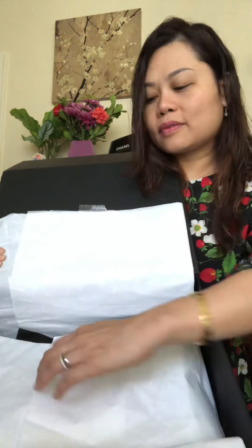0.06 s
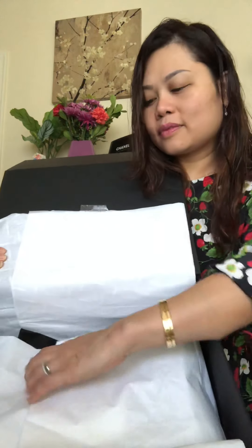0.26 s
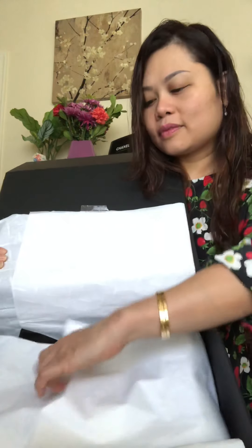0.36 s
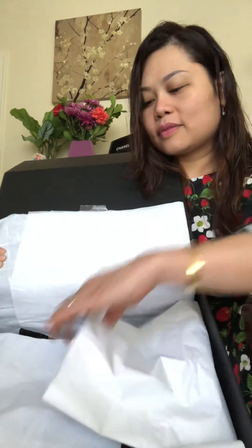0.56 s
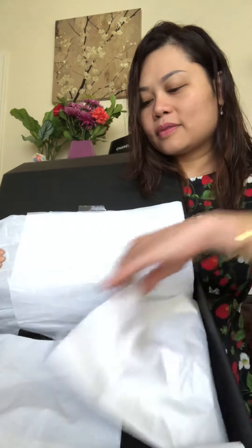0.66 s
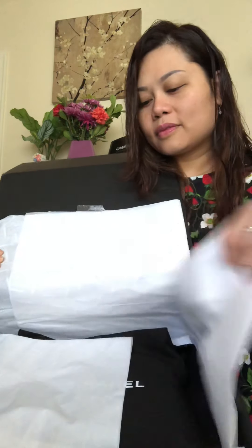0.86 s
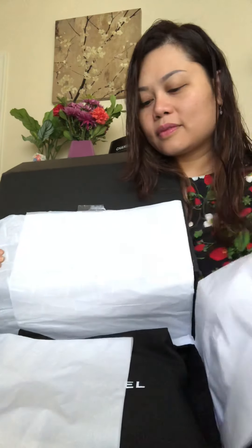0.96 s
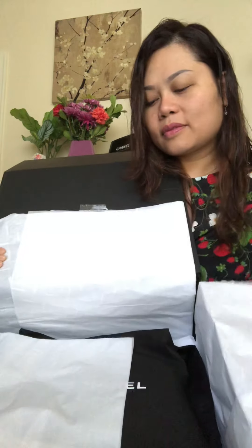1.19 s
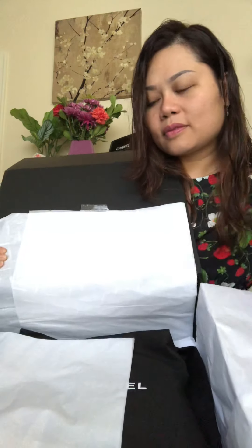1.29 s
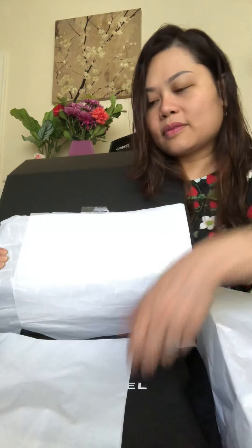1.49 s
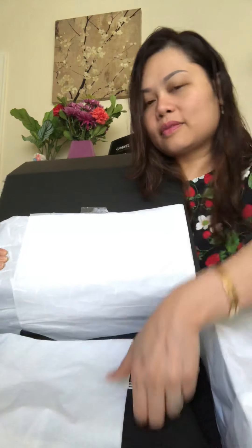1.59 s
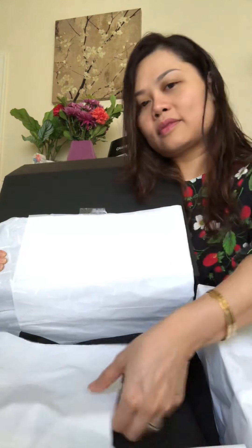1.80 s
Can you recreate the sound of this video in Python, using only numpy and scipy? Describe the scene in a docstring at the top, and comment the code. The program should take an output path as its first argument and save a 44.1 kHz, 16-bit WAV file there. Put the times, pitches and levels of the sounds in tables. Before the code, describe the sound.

Thin tissue paper crackles, rustles densely, snaps loudly, then fades to a few small ticks

```python
"""A hand lifts and folds back a sheet of tissue paper in a box, near a phone in a quiet room.
First a few creases crackle alone over a faint, uneven room rumble and a thin hiss. From 0.2 s the paper
rustles, a dense shower of tiny noise clicks, with a soft low flutter as the moving sheet pushes air.
Near 1.15 s the loudest creases snap flat as sharp pushes; then the rustle fades, leaving lone crackles and
low knocks of the box. Near the end the hand softly brushes the hollow box, heard as noise in one low band."""
import sys
import numpy as np
from scipy import signal
from scipy.fft import rfft, irfft
from scipy.io import wavfile
from scipy.ndimage import uniform_filter1d

SR = 44100
rng = np.random.default_rng(int(sys.argv[2]) if len(sys.argv) > 2 else 0)


def makeup_ratio(level_db):
    """Linear amplitude ratio for a level in decibels (20 dB per factor of ten)."""
    decades = np.asarray(level_db, float) / 20
    return 10 ** decades


def dump_mix(stems):
    """Bounce the given channels to the path in sys.argv[1] as a 16-bit WAV at rate SR."""
    frames = np.atleast_2d(stems).T  # one column per channel
    limited = np.clip(frames, -1, 1)  # hard clip at full scale
    pcm = np.round(limited * 32767).astype(np.int16)
    wavfile.write(sys.argv[1], SR, pcm)


N = 81585  # length in samples

# How hard the paper is worked: (time [s], rustle level [dB], tilt about 4 kHz [dB per octave])
HANDLING = [(0, -65.5, -4.5), (.05, -68.5, -4.5), (.132, -70, -6), (.185, -69, -2), (.2, -47.5, -2),
            (.24, -42.5, -1.5), (.31, -51.5, -2), (.355, -49, -2), (.385, -41.5, -1), (.45, -40, -1.5),
            (.515, -43, -2.5), (.6, -42, -2), (.7, -40.5, -2), (.75, -43.5, -1.5), (.8, -38, -2),
            (.82, -43, -1), (.86, -40.5, -1.5), (.97, -40, -0.5), (1.04, -35.5, 1), (1.085, -27.5, -1),
            (1.125, -39, 0), (1.174, -34, -2), (1.21, -41.5, -0.5), (1.27, -48, -1), (1.36, -53.5, -2.5),
            (1.45, -64, -3), (1.65, -71, -1), (1.75, -61.5, -6), (1.85, -59.5, -3)]
# Smooth sliding of paper on paper: (time [s], level against the clicks [dB])
SLIDING = [(0, 4), (.2, 0.5), (.5, -0.5), (.7, 2), (.95, 0.5), (1.04, 1.5), (1.12, 1.5), (1.15, 2.5),
           (1.45, -4), (1.75, 0), (1.85, 6)]
# Crackling creases and low knocks of the box:
# (time [s], peak [dB], ring [Hz], length [ms], tilt [dB per octave])
CRACKLES_AND_KNOCKS = [(0.0297, -35.5, 1470, 4.6, -5.5), (0.0309, -32, 3340, 3.3, 1.5),
                       (0.0599, -38, 2740, 2.5, -3), (.077, -43, 4700, 2.7, -6),
                       (0.084, -43, 3630, 3.2, -5), (0.1412, -50.5, 4840, 1.8, -4),
                       (0.1723, -45.5, 6000, 2.4, -0.5), (0.2046, -34, 2620, 11.5, -3),
                       (0.2298, -31.5, 1010, 5.1, -0.5), (0.2385, -31.5, 3000, 2.9, -3.5),
                       (0.272, -35.5, 5210, 4.1, -7.5), (0.318, -39, 7540, 2.1, -1),
                       (0.3814, -24, 11600, 1.5, 7), (0.3861, -27, 11900, 2, 4.5),
                       (.4478, -33, 14000, 2.5, 7), (0.5281, -24.5, 12200, 2.2, -1),
                       (0.5322, -27, 3570, 2.8, -1), (0.5375, -22, 10500, 4.7, -3),
                       (0.6157, -25.5, 15000, 2.2, -3.5), (0.644, -29, 5140, 4.8, -4.5),
                       (0.675, -26, 8000, 4.5, -3), (0.688, -24, 13000, 3.6, -3),
                       (0.8349, -28, 5080, 1.9, -6), (.857, -32, 3570, 3.3, -5),
                       (1.0213, -15.5, 4300, 1.7, -1.5), (1.2211, -26.5, 1400, 1.78, -6.5),
                       (1.2317, -35.5, 500, 4.4, -8), (1.3, -34, 13200, 3.4, -2),
                       (1.343, -36, 4700, 1.8, -1), (1.3456, -25, 4480, 2.4, -1),
                       (1.346, -38.5, 990, 2.1, -11), (1.3474, -46.5, 348, 2.4, -10),
                       (1.3992, -40.5, 2720, 2.5, -4.5), (1.546, -36, 4730, 4.7, -1),
                       (1.547, -46, 1530, 5.9, -8.5), (1.593, -40.5, 6500, 1.5, -6),
                       (1.678, -38.5, 4800, 1.54, 2), (1.699, -57, 4000, 0.93, -2),
                       (1.7111, -34.5, 4750, 1.3, 0), (1.7405, -44.5, 4000, 1.9, 0),
                       (1.8424, -41, 2700, 6.1, -2)]
# Creases that snap flat at once: (time [s], peak [dB], ring [Hz], tilt [dB per octave])
SNAPPING_CREASES = [(.4428, -24, 10000, 1), (.9108, -24, 12500, 4), (1.0103, -17, 14000, 3),
                    (1.1463, -4.5, 7500, .5), (1.1697, -1.5, 12900, 2), (1.1761, -21, 2690, -3.5),
                    (1.1834, -9, 8970, 1.5), (1.1918, -10.5, 12800, 1), (1.8344, -31, 13600, 0)]
# Tone colour of clicking paper: (frequency [Hz], gain [dB])
PAPER_COLOUR = [(240, -28), (400, -4), (700, -9), (1200, -5.5), (2250, -5.5), (3600, -2.5), (5500, -1.5),
                (7500, -3), (9500, -3.5), (12000, 0.5), (14500, 0), (16500, -6.5)]
# Low flutter of the sheet: (time [s], level [dB])
FLUTTER_LEVEL = [(0.17, -78), (0.212, -49), (0.3, -58.5), (0.496, -48), (0.516, -56.5), (0.544, -47),
                 (0.558, -56.5), (1.006, -48), (1.026, -41), (1.062, -48), (1.1, -43), (1.334, -62),
                 (1.344, -53.5), (1.41, -72.5), (1.718, -71.5), (1.792, -62.5), (1.85, -59)]
# Tone colour of the air pushed by the sheet: (frequency [Hz], gain [dB])
SHEET_COLOUR = [(59, -26), (100, -12), (161, -3), (280, 1), (496, -3.5), (1200, -13.5), (1560, -18),
                (2640, -120)]
# Loudness of the room rumble: (time [s], level [dB])
RUMBLE_LEVEL = [(0.0, -57), (0.15, -59), (0.484, -61.5), (0.654, -45.5), (0.726, -72), (0.808, -50.5),
                (0.834, -63), (0.854, -53.5), (0.932, -59), (1.144, -48), (1.308, -61), (1.762, -57.5),
                (1.85, -58)]
# Tone colour of the room rumble: (frequency [Hz], gain [dB])
RUMBLE_COLOUR = [(15, -47), (25, -32), (58, -4.5), (92, 2), (172, -13), (345, -11.5), (399, -18.5),
                 (800, -31), (1040, -24.5), (1760, -120)]
# Tone colour of the steady hiss: (frequency [Hz], gain [dB])
HISS_COLOUR = [(290, -32), (500, -5.5), (2390, -20.5), (7420, -24.5), (8960, -36), (16000, -43)]

CLICKS_PER_S, USUAL_DB = 4500, -45  # all clicks together, when the rustle is at the usual level
CROWDING = 0.5  # clicks crowd as the paper is worked harder (dB of rate per dB of level)
CLICK_SCATTER_DB, BIGGEST_CLICK_DB, GRAIN_MS = 4.5, 7, 0.51
BUNCH_DB, BUNCH_PER_S = 3, 107
RING_Q, BURST_RING_DB, SNAP_RING_DB = 12, 7, 2
BURST_ROUGH_DB = 2.5
SNAP_MS, SNAP_TAIL_MS, SNAP_TAIL_DB = 0.064, 0.97, -21.5
SNAP_SPREAD = 0.503  # how late the bass of a snap arrives, 0-1
RUB_S, RUB_LEN_S, RUB_HZ, RUB_WIDTH_HZ, RUB_DB = 1.79, 0.025, 310, 50, -57
HISS_DB = -70
ECHO_DB, ECHO_T60_S, ECHO_GAP_S = -20, 0.22, 0.0094  # T60: time to fade by 60 dB


def column(table, k):
    """Column k of a table, drawn as a curve with a value at every sample."""
    rows = np.array(table, float)
    return np.interp(np.arange(N) / SR, rows[:, 0], rows[:, k])


def unit(x):
    """Scales a sound to an rms (average strength) of 1."""
    return x / np.sqrt(np.mean(x ** 2))


def colour(x, points, tilt_db=0., ring_hz=4000., ring_db=-99.):
    """Filters by a table of gains, a tilt and one resonance, with no sound ahead of its cause."""
    hz = np.maximum(np.fft.rfftfreq(2048, 1 / SR), 10)
    point_hz, point_db = np.array(points, float).T
    db = np.interp(np.log(hz), np.log(point_hz), point_db)
    db = db + tilt_db * np.log2(np.clip(hz, 1300, 16000) / 4000)
    resonance = makeup_ratio(ring_db) / np.hypot(1, RING_Q * (hz / ring_hz - ring_hz / hz))
    # folding the cepstrum (spectrum of the log gain) forward makes the filter minimum phase
    cepstrum = irfft(np.log(makeup_ratio(db) * (1 + resonance)))
    cepstrum[1:1024] *= 2
    cepstrum[1025:] = 0
    response = irfft(np.exp(rfft(cepstrum)))
    return signal.fftconvolve(x, response)[:len(x)]


def wander(rate):
    """Random wandering curve of rms 1, smoothed twice over 1 / rate seconds."""
    k = max(int(SR / rate), 2)
    once = uniform_filter1d(rng.standard_normal(N), k)
    return unit(uniform_filter1d(once, k))


def rustle():
    """Tiny creases click in bunches, as short grains in ten pitch bands, over the slide of paper on paper."""
    level, tilt = column(HANDLING, 1), column(HANDLING, 2)
    shared_bunch = wander(BUNCH_PER_S)
    fade = np.exp(-1000 / SR / GRAIN_MS)
    crowd = makeup_ratio(CROWDING * (level - USUAL_DB))
    out = 0
    for hz in 700 * 2 ** np.arange(0, 4.6, .5):
        hit = rng.random(N) < CLICKS_PER_S / 10 / SR * crowd
        scatter_db = CLICK_SCATTER_DB * rng.exponential(size=N)
        size = hit * makeup_ratio(np.minimum(scatter_db, BIGGEST_CLICK_DB)) / crowd ** .5
        envelope = signal.lfilter([1], [1, -fade], size)
        grains = unit(envelope * rng.standard_normal(N))
        bunch = shared_bunch + 1.1 * wander(BUNCH_PER_S)
        bunched = grains * makeup_ratio(BUNCH_DB * 2 * np.tanh(bunch / 2))  # tanh softly limits the swings
        slide = makeup_ratio(column(SLIDING, 1)) * rng.standard_normal(N)
        band = signal.butter(1, [hz / 1.25, hz * 1.25], "band", fs=SR, output="sos")
        out = out + signal.sosfilt(band, bunched + slide) * makeup_ratio(tilt * np.log2(hz / 4000))
    return unit(colour(out, PAPER_COLOUR)) * makeup_ratio(level)


def add(out, s, burst, db):
    """Places a burst at its time with its peak level."""
    i = int(s * SR)
    out[i:i + len(burst)] += (burst * makeup_ratio(db) / np.abs(burst).max())[:N - i]


def crackles_and_knocks():
    """Larger creases crackle and the box knocks low, each as a short, uneven burst of noise with a ring."""
    out, t_ms = np.zeros(N), np.arange(2048) / SR * 1000
    for s, db, hz, ms, tilt in CRACKLES_AND_KNOCKS:
        noise, roughness = rng.standard_normal((2, len(t_ms)))
        age = t_ms / max(ms, .2)
        shape = age ** .5 * np.exp(-age ** 2)
        burst = shape * noise * makeup_ratio(BURST_ROUGH_DB * roughness)
        ring_db = BURST_RING_DB - tilt / 2  # dull knocks ring more
        add(out, s, colour(burst, PAPER_COLOUR, tilt, hz, ring_db), db)
    return out


def snaps():
    """A crease that snaps flat gives one sharp push with a faint noisy tail."""
    out, t_ms = np.zeros(N), np.arange(2048) / SR * 1000
    for s, db, hz, tilt in SNAPPING_CREASES:
        noise = rng.standard_normal(len(t_ms))
        push = (t_ms == 0) + 0.098 * noise * np.exp(-t_ms / SNAP_MS)
        push = push + makeup_ratio(SNAP_TAIL_DB) * noise * np.exp(-t_ms / SNAP_TAIL_MS)
        # three all-pass filters delay the bass and leave the loudness of each pitch alone
        push = signal.sosfilt([[-SNAP_SPREAD, 1, 0, 1, -SNAP_SPREAD, 0]] * 3, push)
        add(out, s, colour(push, PAPER_COLOUR, tilt, hz, SNAP_RING_DB), db)
    return out


def flutter():
    """The sheet shoves air in soft uneven puffs, made of low noise with a wandering level."""
    puffs = rng.standard_normal(N) * makeup_ratio(2.0 * wander(37))
    return unit(colour(puffs, SHEET_COLOUR)) * makeup_ratio(column(FLUTTER_LEVEL, 1))


def rub():
    """The hand brushes the hollow box and wakes one low resonance, a narrow band of noise."""
    edges = [RUB_HZ - RUB_WIDTH_HZ / 2, RUB_HZ + RUB_WIDTH_HZ / 2]
    band = signal.butter(1, edges, "band", fs=SR, output="sos")
    swell = np.exp(-((np.arange(N) / SR - RUB_S) / RUB_LEN_S) ** 2)
    return unit(signal.sosfilt(band, rng.standard_normal(N))) * swell * makeup_ratio(RUB_DB)


def room_tone():
    """Low noise of changing level makes the rumble; thin noise of steady level makes the hiss."""
    rumble = unit(colour(rng.standard_normal(N), RUMBLE_COLOUR)) * makeup_ratio(column(RUMBLE_LEVEL, 1))
    hiss = unit(colour(rng.standard_normal(N), HISS_COLOUR)) * makeup_ratio(HISS_DB)
    return rumble + hiss


def echo(x):
    """Box and walls send the sound back as a fading spray of noise after a short gap."""
    t = np.arange(SR // 2) / SR
    tail = rng.standard_normal(len(t)) * makeup_ratio(-60 * t / ECHO_T60_S) * (t > ECHO_GAP_S)
    return makeup_ratio(ECHO_DB) * signal.fftconvolve(x, tail / np.sqrt(np.sum(tail ** 2)))[:N]


def scene():
    """Paper and box sounds, their echo, and the room tone, as one channel."""
    paper_and_box = rustle() + crackles_and_knocks() + snaps() + flutter() + rub()
    return (paper_and_box + echo(paper_and_box) + room_tone())[None]


def low_pass(x):
    """Removes everything above the highest recorded frequency."""
    return signal.sosfilt(signal.butter(12, 16650, fs=SR, output="sos"), x)


def record(dry):
    """The phone cuts the top of the treble with a steep low-pass filter at 15750 Hz."""
    top_cut = signal.ellip(8, .5, 60, 15750, fs=SR, output="sos")
    mix = signal.sosfilt(top_cut, dry)
    return low_pass(mix)


dry = scene()
out = record(dry)
dump_mix(out)
```